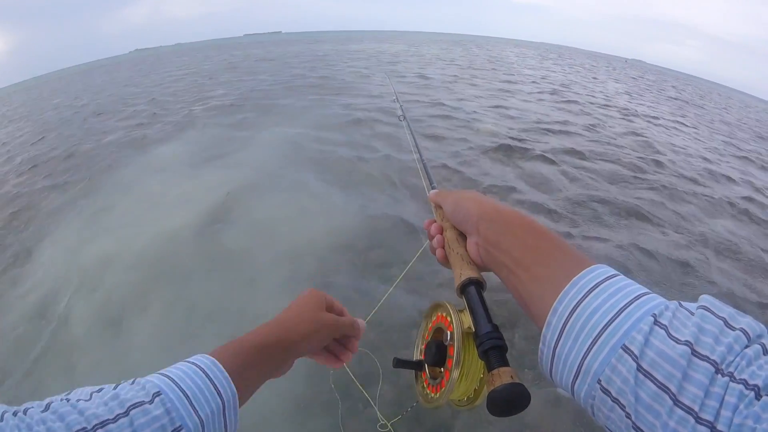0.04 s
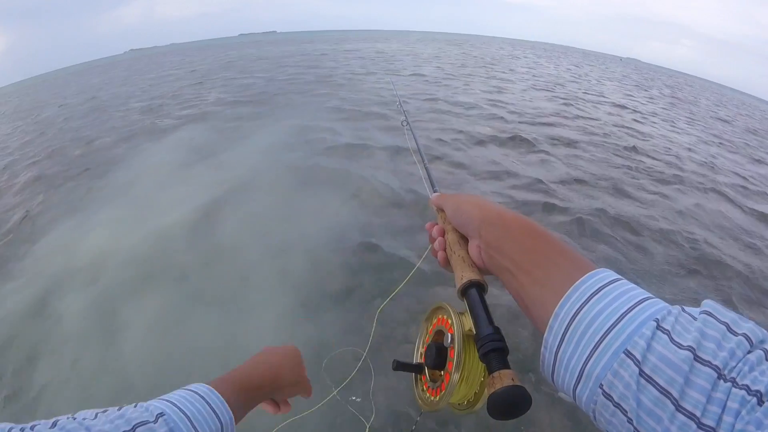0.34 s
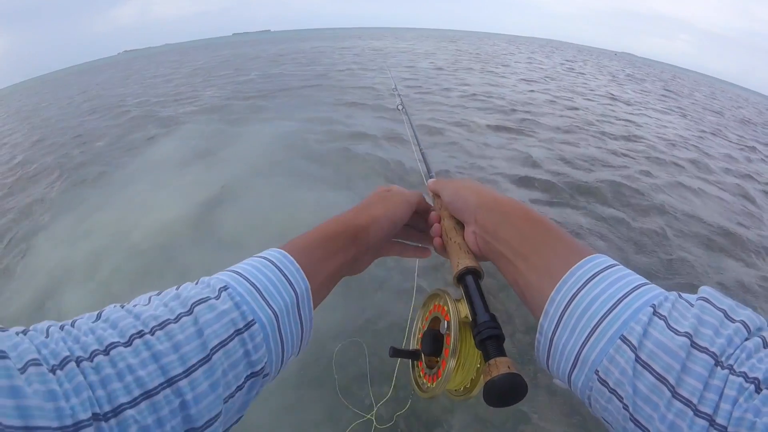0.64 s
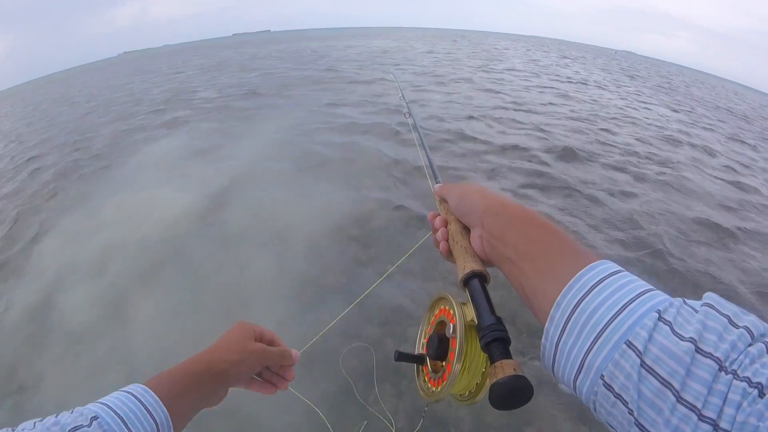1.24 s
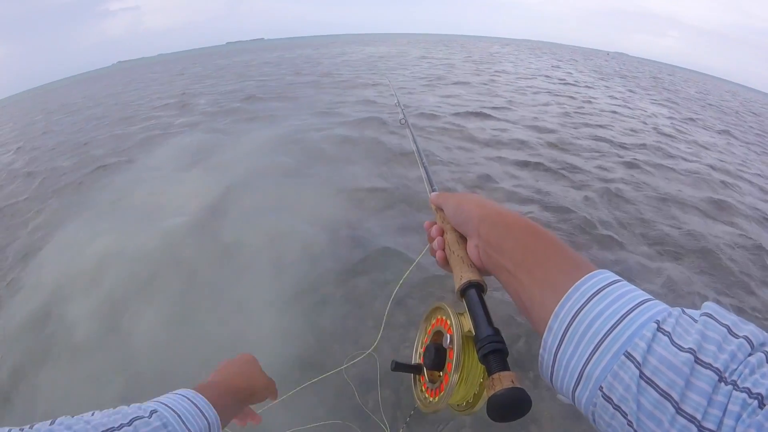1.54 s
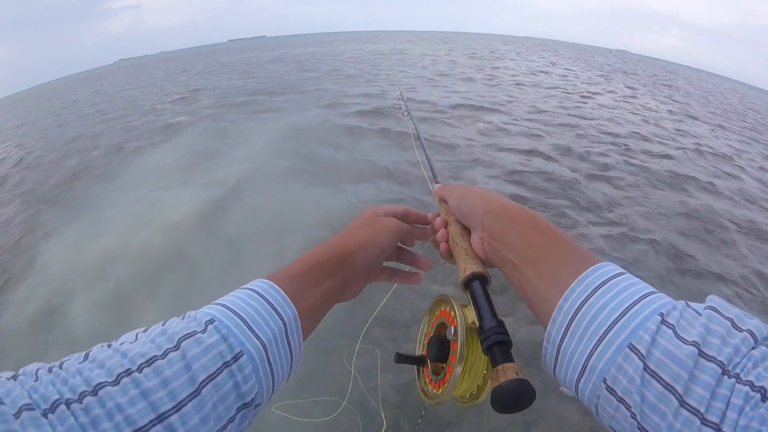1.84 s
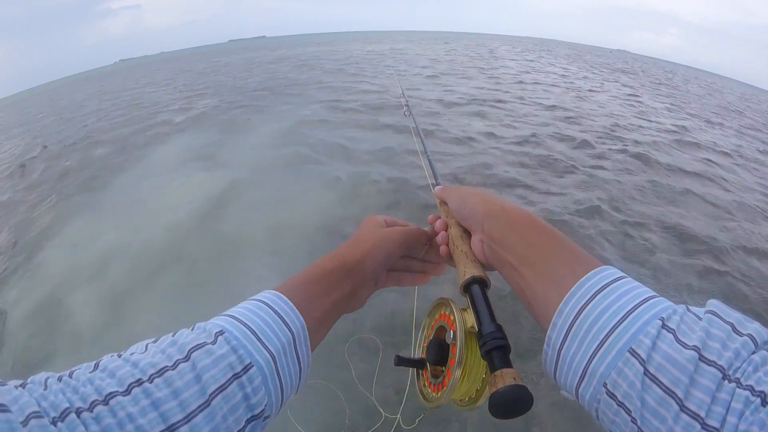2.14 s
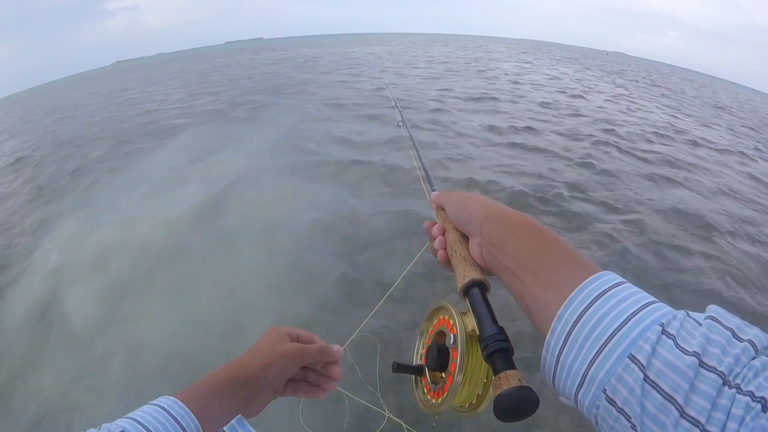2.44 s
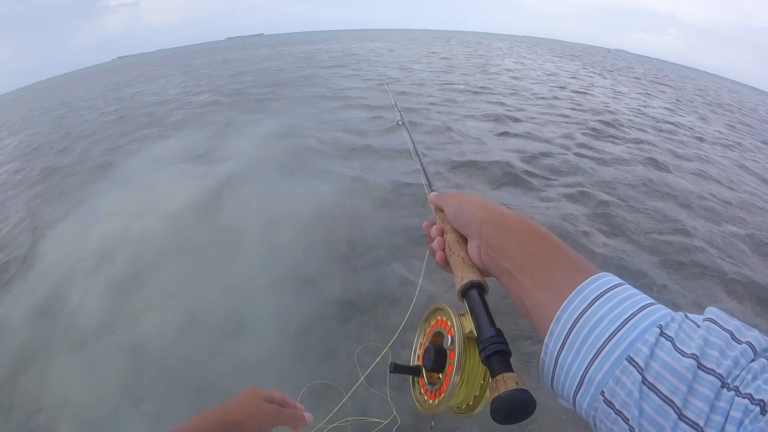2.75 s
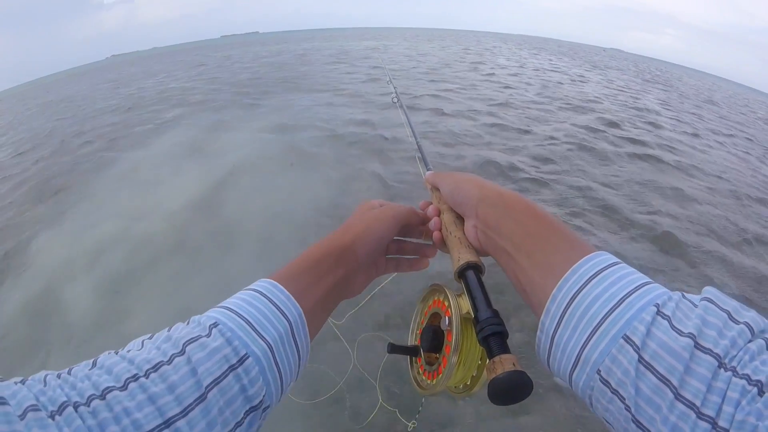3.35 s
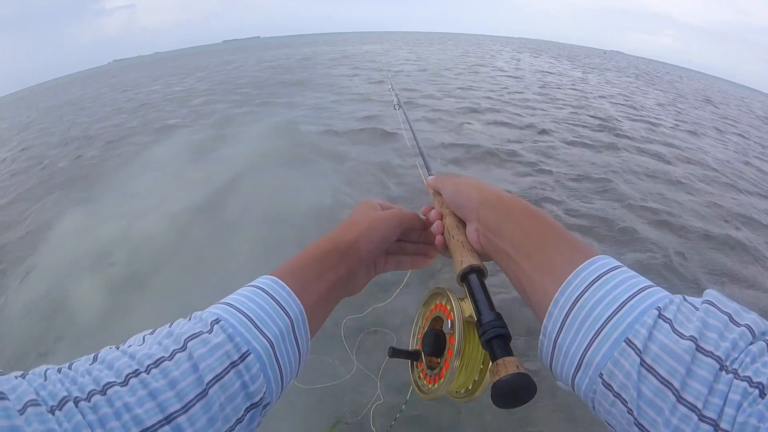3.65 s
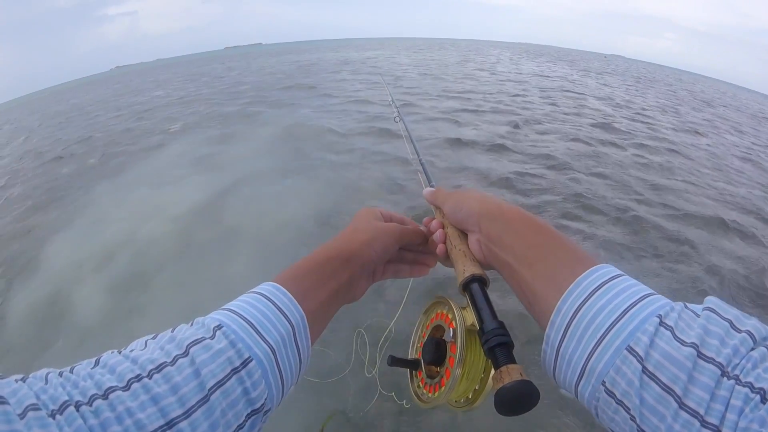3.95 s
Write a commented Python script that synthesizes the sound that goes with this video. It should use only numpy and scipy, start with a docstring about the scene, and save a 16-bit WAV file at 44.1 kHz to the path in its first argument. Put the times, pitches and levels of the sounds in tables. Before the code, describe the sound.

Fishing line buzzes softly through rod guides in three close pulls, at about 0 to 0.4, 1 to 1.6 and 2.3 to 2.8 seconds, each rasp rising then falling in pitch. Wind rumbles and thumps on the microphone throughout, strongest from about 2.1 to 2.9 seconds, with one sharp tick at 2.3. Underneath, shallow water washes faintly with scattered small laps and plips until the end at 4 seconds.

```python
"""A fly line, stripped in by hand three times, close to a body-worn microphone over shallow water.
Its fine texture buzzes and rasps through the rod guides; pitch follows hand speed and the rod rings.
Gusts rumble and thump on the microphone, with one sharp overload tick at 2.3 s.
Ripples wash and bubbles plip behind a faint, steady microphone hiss."""
import sys
import numpy as np
from scipy import signal
from scipy.fft import rfft, irfft
from scipy.io import wavfile
from scipy.ndimage import uniform_filter1d, minimum_filter1d

SR = 44100
rng = np.random.default_rng(int(sys.argv[2]) if len(sys.argv) > 2 else 0)


def file_out(sig):
    """Save sig as 16-bit WAV at sys.argv[1]."""
    # one column per channel
    cols = np.atleast_2d(sig).T
    # limit, then scale
    lim = np.clip(cols, -1, 1)
    pcm = np.round(lim * 32767).astype(np.int16)
    wavfile.write(sys.argv[1], SR, pcm)


N = 176400

# line texture passing the guides, one table per pull (time [s], rate [Hz])
PULL_RATE = [
    [(.03, 700), (.11, 1280), (.14, 1470), (.195, 2250), (.235, 2570), (.262, 2460), (.295, 1900),
     (.33, 1450), (.41, 650)],
    [(.99, 500), (1.15, 1030), (1.3, 1200), (1.375, 1570), (1.42, 1650), (1.47, 1570), (1.52, 1300),
     (1.59, 900)],
    [(2.31, 450), (2.48, 1060), (2.56, 1540), (2.62, 1640), (2.68, 1320), (2.715, 1130), (2.8, 600)],
]
# friction envelope, one table per pull (time [s], level [dB])
PULL_ENVELOPE = [
    [(.02, -55), (.06, -51), (.11, -44.5), (.2, -46), (.28, -41.5), (.325, -48), (.36, -48.5), (.42, -71)],
    [(.99, -62), (1.05, -53.5), (1.13, -49), (1.29, -47), (1.38, -43.5), (1.44, -48.5), (1.52, -42.5),
     (1.565, -49), (1.6, -89)],
    [(2.31, -54), (2.42, -50.5), (2.48, -47), (2.55, -46), (2.63, -46.5), (2.7, -47), (2.76, -54),
     (2.81, -70)],
]
# friction, one row per pull (slip spread [fraction of speed], buzz gain [dB], rasp gain [dB])
PULL_FRICTION = [(.024, -3, -2.5), (.028, -4, -2.5), (.034, -4, -2.5)]
# buzz spectrum, one row per pull (relative level of partials 1 to 4 [dB])
PULL_PARTIALS = [(-5, 2, -13, -24), (-7, 0, 0, -7), (-7, 0, 1, -10)]
# rod and guide resonances (frequency [Hz], width [Hz], gain [dB])
ROD_MODES = [(2260, 70, 0), (2620, 100, 1), (2820, 70, -1), (3130, 70, -1), (3325, 70, -2), (3570, 100, -4),
             (3890, 80, 0), (4300, 60, 1), (4680, 90, 1), (4935, 60, 0), (5190, 120, -6), (5390, 90, -7)]
# rod radiation (frequency [Hz], gain [dB])
ROD_RADIATION = [(500, -46), (1400, -26), (1900, -5), (2300, -6.5), (3200, -3.5), (4300, -5.5), (5200, -8),
                 (6400, -3), (7200, -15), (10000, -38), (16000, -44)]
# wind strength (time [s], deep rumble [dB], upper flutter [dB])
GUSTS = [(0.0, -8, -18), (0.12, -12, -29), (0.19, -20, -38.5), (0.41, -20, -30.5), (0.5, -12, -29),
         (0.67, -28.5, -46), (0.7, -16.5, -36), (0.83, -24.5, -35.5), (0.89, -15.5, -28),
         (0.95, -26.5, -41.5), (1.0, -23, -28), (1.05, -27.5, -52), (1.08, -10, -26.5), (1.15, -21.5, -42),
         (1.27, -19.5, -25), (1.3, -17.5, -45.5), (1.47, -20.5, -24), (1.5, -20.5, -26),
         (1.56, -14.5, -30.5), (1.59, -16, -27.5), (1.73, -26.5, -35.5), (1.75, -15.5, -30),
         (1.89, -14, -29.5), (1.92, -16.5, -38.5), (2.07, -28.5, -46.5), (2.15, -11, -22.5),
         (2.18, -11, -43), (2.21, -24.5, -53), (2.32, -9.5, -15.5), (2.35, -12, -30), (2.38, -12.5, -21),
         (2.46, -26.5, -37), (2.54, -9, -17.5), (2.58, -21.5, -41), (2.61, -14, -22.5), (2.75, -19.5, -34),
         (2.8, -8, -18), (2.81, -16.5, -25), (2.94, -15.5, -26.5), (3.03, -23, -47), (3.16, -26, -42.5),
         (3.19, -18.5, -24.5), (3.21, -12.5, -35.5), (3.26, -19, -28.5), (3.32, -19.5, -34.5),
         (3.38, -16.5, -25.5), (3.45, -28.5, -50), (3.51, -13, -37), (3.58, -28.5, -43), (3.91, -26.5, -47),
         (3.94, -22.5, -31), (4.0, -14.5, -43)]
# wind bands (centre [Hz], level at reference gust [dB], flutter share [0-1], eddy depth [dB])
WIND_BANDS = [(27.7, -29.5, 0, 5.5), (52, -22, 0.01, 7), (113.6, -27.5, 0.23, 3.5), (212.5, -35.5, 0.98, 5),
              (333, -43.5, 1, 1.5), (474, -49, 1, 8), (920, -66.5, 0.5, 3)]
# wind thumps on the microphone, plus one overload tick at 2.3 s (time [s], level [dB], centre [Hz])
THUMPS_AND_TICK = [(.085, -16, 112), (0.898, -10, 60), (1.1, -31, 59), (1.502, -14, 246), (1.504, -3, 98.5),
                   (1.757, -9, 73), (1.792, -9, 94), (1.822, -9, 130), (1.889, -12, 110),
                   (2.149, -17.5, 158), (2.173, -6.5, 90), (2.221, -30, 450), (2.27, -19.5, 336),
                   (2.301, -1, 139), (2.302, -27.5, 1290), (2.311, -6, 128), (2.318, -0.5, 216),
                   (2.376, -8.5, 110), (2.385, -14, 353), (2.535, -10, 109), (2.612, -18.5, 344),
                   (2.632, -13, 157), (2.791, -7, 216), (2.824, -9.5, 98), (2.853, -8, 80),
                   (2.885, -8, 160), (2.924, -22, 303), (2.931, -7, 138), (3.266, -13.5, 139),
                   (3.514, -13, 55.6)]
# laps and bubbles (time [s], start pitch [Hz], level [dB], decay to 1/e [cycles])
WATER_PLIPS = [(.525, 1800, -43.5, 12), (0.586, 1250, -38, 7.2), (.872, 580, -25, 2.7),
               (1.244, 1197, -30, 7.6), (1.811, 536, -17.5, 2.3), (1.9, 1860, -37.5, 13.5),
               (2.149, 583, -12.5, 1.75), (2.809, 1160, -41, 9), (2.877, 515, -20, 3.4),
               (2.959, 1010, -26.5, 4), (3.358, 446, -16.5, 2.2), (3.803, 790, -33, 3.3)]
# ripple spectrum (frequency [Hz], relative density [dB])
WASH = [(150, -8.5), (400, 4.5), (700, -2.5), (1200, -4.5), (1800, -13), (2600, -16), (4000, -26.5),
        (6000, -35.5), (14000, -53)]
# microphone hiss spectrum (frequency [Hz], relative density [dB])
HISS = [(2000, -19.5), (5900, -14), (6250, -6), (6500, 1), (7100, -6), (8500, -9), (9500, -13),
        (10300, -20), (11700, -17.5), (13000, -24), (14200, -43)]

T = np.arange(N) / SR
FREQS = np.maximum(np.fft.rfftfreq(N, 1 / SR), 1)


def fly_line(jerk_share=.025, jerks_per_s=60, slips_per_s=450, catch_db=2.8, catches_per_s=80,
             grain_db=2.0, rod_body_db=-10, speed_power=1.3):
    """Textured line jerks, slips and catches on the guides; its buzz and rasp ring the rod."""
    modes = sum(undb(db) / (1 + 2j * (FREQS - hz) / width_hz) for hz, width_hz, db in ROD_MODES)
    rod = (undb(rod_body_db) + modes) * colour(ROD_RADIATION)
    out = 0
    for rates, levels, friction, partials in zip(PULL_RATE, PULL_ENVELOPE, PULL_FRICTION, PULL_PARTIALS):
        slip_share, buzz_db, rasp_db = friction
        effort = undb(curve(levels, left=-200, right=-200))
        effort_rms = np.sqrt(np.mean(effort ** 2))
        rate_hz = curve(rates) * (1 + jerk_share * walk(jerks_per_s))
        buzz = 0
        for harmonic, db in enumerate(partials, 1):
            hz = harmonic * rate_hz * (1 + slip_share * walk(slips_per_s))
            phase = 2 * np.pi * np.cumsum(hz) / SR
            buzz += undb(db + catch_db * walk(catches_per_s)) * np.sin(phase)
        rasp = rng.standard_normal(N) * undb(grain_db * walk(slips_per_s))
        for drive, db in ((buzz * rate_hz ** speed_power, buzz_db), (rasp, rasp_db)):
            out += undb(db) * effort_rms * unit_rms(filtered(drive * effort, rod))
    return out


def wind(rumble_ref_db=-19, flutter_ref_db=-34, eddies_per_s=41):
    """Turbulence on the microphone, in bands half an octave apart; eddies flutter all bands together."""
    rumble_db = curve([(at_s, db) for at_s, db, _ in GUSTS]) - rumble_ref_db
    flutter_db = curve([(at_s, db) for at_s, _, db in GUSTS]) - flutter_ref_db
    eddies = np.tanh(walk(eddies_per_s))
    centres_hz, *columns = np.array(WIND_BANDS).T
    out = 0
    for hz in 28 * 2 ** np.arange(0, 5.6, .5):
        db, share, depth_db = (np.interp(np.log(hz), np.log(centres_hz), column) for column in columns)
        band = noise(np.cos(np.pi * np.clip(np.log2(FREQS / hz), -.5, .5)))
        local_power = uniform_filter1d(band ** 2, int(SR * max(.04, 2 / hz)))
        steady_band = band / np.sqrt(local_power + .2)
        gust = undb(db + (1 - share) * rumble_db + share * flutter_db)
        out += steady_band * unit_rms(undb(depth_db * eddies)) * gust
    return out


def thumps_and_tick(swing_db=.5, churn_db=-19, churn_s=.0085):
    """Wind thumps on the microphone and one sharp overload tick; each is one swing in a noise burst."""
    out = np.zeros(N)
    for at_s, db, hz in THUMPS_AND_TICK:
        phase = 2 * np.pi * hz * (T - at_s)
        swing = -phase * np.exp(.5 * (1 - phase ** 2))
        window = np.exp(-.5 * ((T - at_s) / churn_s) ** 2)
        churn = noise(FREQS * np.exp(-FREQS / hz)) * window
        out += undb(db) * (undb(swing_db) * swing + undb(churn_db) * churn)
    return out


def water(wash_db=-47.5, drift_db=.5, drifts_per_s=6.7, attack_s=.0012, rise_per_s=1.8):
    """Ripples wash; now and then a wavelet laps or a bubble rings and glides up."""
    out = undb(wash_db + drift_db * walk(drifts_per_s)) * noise(colour(WASH))
    for at_s, hz, db, cycles in WATER_PLIPS:
        age_s = np.clip(T - at_s, 0, .2)
        envelope = (1 - np.exp(-age_s / attack_s)) * np.exp(-age_s * hz / cycles)
        phase = 2 * np.pi * hz * age_s * (1 + .5 * rise_per_s * age_s)
        out += undb(db) * envelope * np.sin(phase)
    return out


def undb(db):
    """Decibels to gain."""
    return 10 ** (np.asarray(db) / 20)


def unit_rms(x):
    """Scale to rms 1."""
    return x / np.sqrt(np.mean(x ** 2))


def curve(rows, **ends):
    """Linear interpolation of (time [s], value) rows."""
    return np.interp(T, *np.array(rows, float).T, **ends)


def colour(points):
    """Gain per bin from (frequency [Hz], level [dB]) points."""
    hz, db = np.array(points, float).T
    return undb(np.interp(np.log(FREQS), np.log(hz), db))


def filtered(x, gain):
    """Apply a gain per frequency bin."""
    return irfft(rfft(x) * gain, N)


def noise(gain):
    """Coloured noise, rms 1."""
    return unit_rms(filtered(rng.standard_normal(N), gain))


def walk(turns_per_s):
    """Smooth random drift, rms 1."""
    return noise(np.exp(-.5 * (2 * FREQS / turns_per_s) ** 2))


def scene():
    """Line, wind and water, mono."""
    return (fly_line() + wind() + thumps_and_tick() + water())[None]


def record(dry):
    """Microphone: low cut, hiss, peak limiter, high cut; the sound fades in over the first few milliseconds."""
    low_cut_hz, high_cut_hz = 5.7, 14200
    hiss_db, limiter_s, fade_s = -58, .0051, .003
    x = filtered(dry, 1 / np.sqrt(1 + (low_cut_hz / FREQS) ** 6))
    x += undb(hiss_db) * noise(colour(HISS))
    span = int(limiter_s * SR)
    limit_gain = 1 / np.maximum(np.abs(x), 1)
    x *= uniform_filter1d(minimum_filter1d(limit_gain, span), span)
    x *= np.minimum(T / fade_s, 1)
    return signal.sosfilt(signal.ellip(8, .2, 70, high_cut_hz, fs=SR, output="sos"), x)


dry = scene()
out = record(dry)
file_out(out)
```